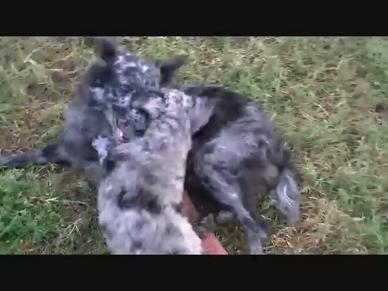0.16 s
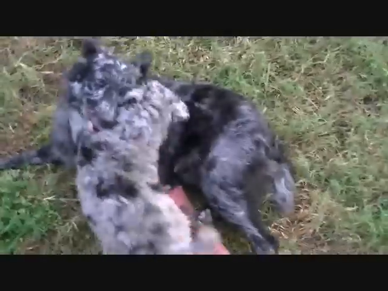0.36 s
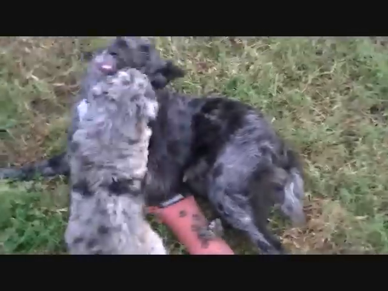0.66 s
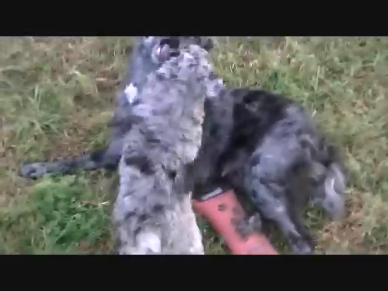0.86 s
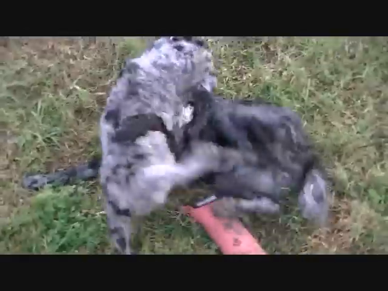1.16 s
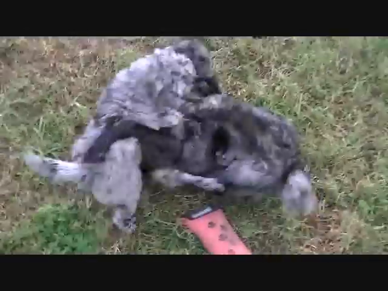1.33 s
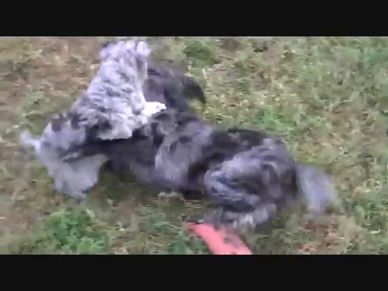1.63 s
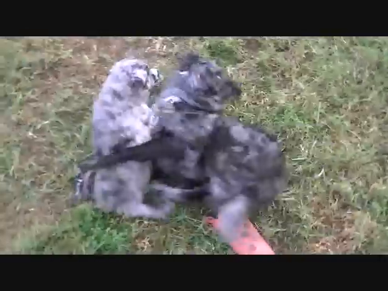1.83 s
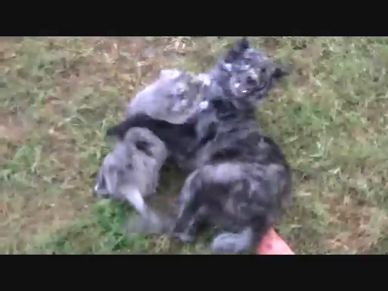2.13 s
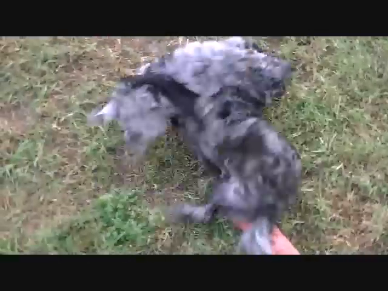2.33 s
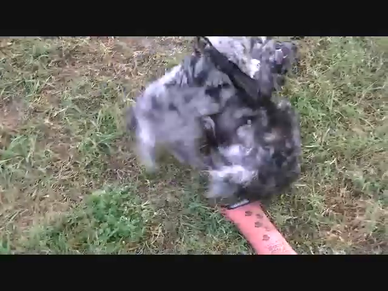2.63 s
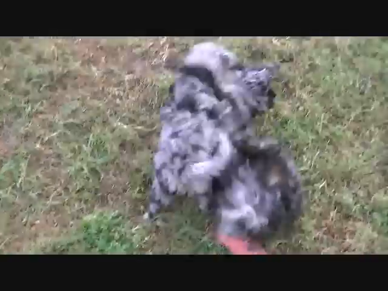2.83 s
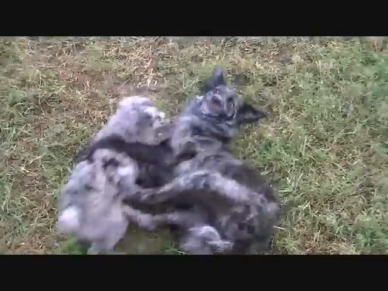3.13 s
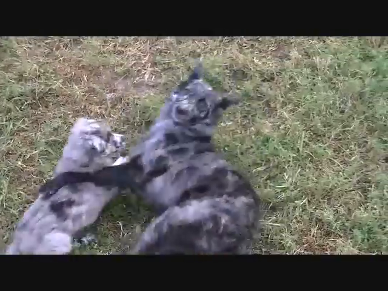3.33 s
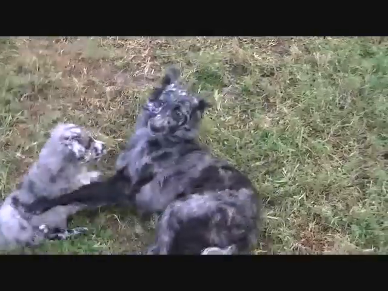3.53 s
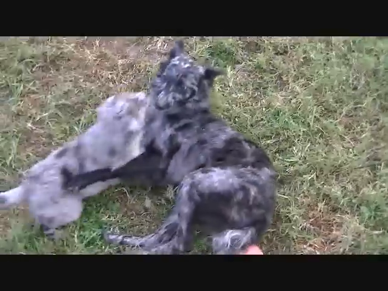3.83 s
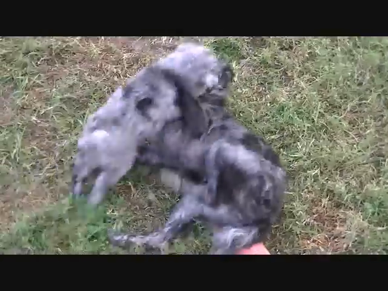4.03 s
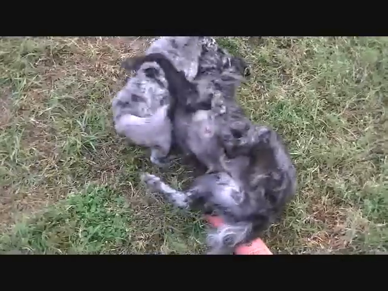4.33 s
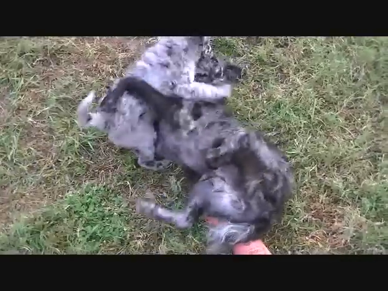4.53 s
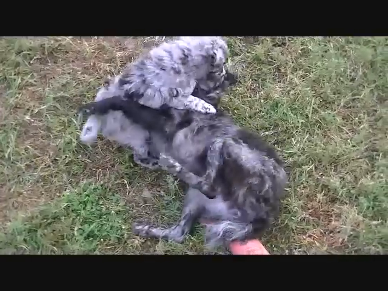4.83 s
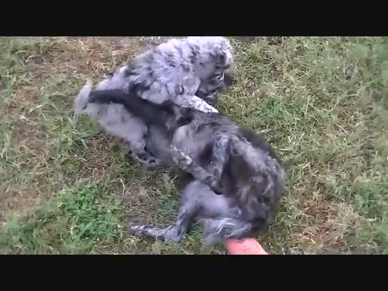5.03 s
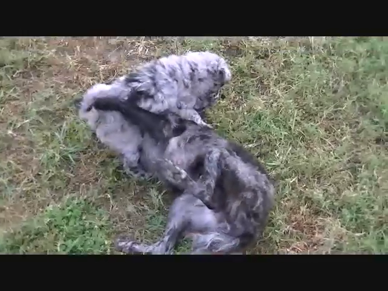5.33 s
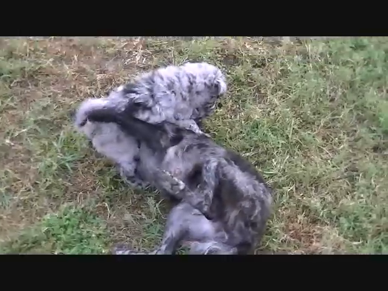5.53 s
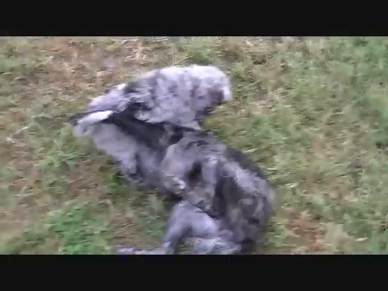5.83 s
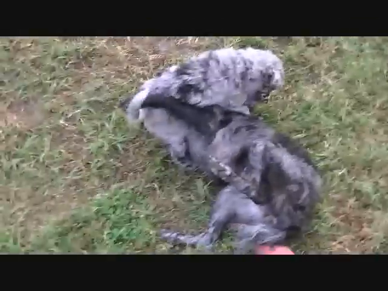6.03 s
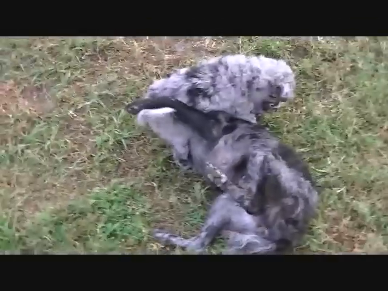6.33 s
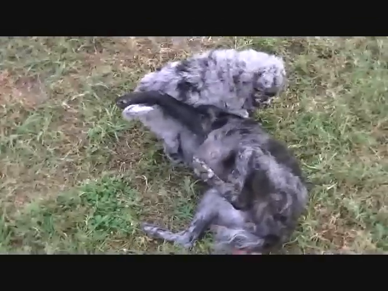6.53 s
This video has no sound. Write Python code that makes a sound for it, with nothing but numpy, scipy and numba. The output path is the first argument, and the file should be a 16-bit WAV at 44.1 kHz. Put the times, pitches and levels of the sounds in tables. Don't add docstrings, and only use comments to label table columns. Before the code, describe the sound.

Outdoors on a lawn, close to a small camera, a loud hollow jaw clap opens over bodies rolling in grass. A tooth snap follows, then hoarse, fluttering snorts and pants come in quick uneven bursts, with wet crackles and short low grunts. The breaths thin out, a few dry ticks sound, and the puppy whimpers at the very end. A small engine drones far away in soft yard hiss.

```python
import sys
import numpy as np
from scipy import signal
from scipy.fft import rfft, irfft
from scipy.io import wavfile
from scipy.ndimage import uniform_filter1d
from numba import njit

SR = 44100
rng = np.random.default_rng(int(sys.argv[2]) if len(sys.argv) > 2 else 0)


def gain_from_db(level_db):
    decades = np.asarray(level_db, float) / 20
    return 10 ** decades


def transcribe(u):
    v = np.clip(np.atleast_2d(u).T, -1, 1)
    q = np.round(v * 32767).astype(np.int16)
    wavfile.write(sys.argv[1], SR, q)


N = 294147


def rms_one(x):
    return x / np.sqrt(np.mean(x ** 2) + 1e-20)


def in_time(rows):
    s, *columns = np.transpose(rows)
    return [np.interp(np.arange(N) / SR, s, c) for c in columns]


def drift(rate_hz):
    r = np.exp(-16 * np.pi * rate_hz / SR)
    slow = signal.lfilter([1], [1, -2 * r, r * r], rng.standard_normal(N // 8 + 9002))[9000:]
    return np.interp(np.arange(N) / 8, np.arange(len(slow)), rms_one(slow))


def band(x, low_hz, high_hz, order=2):
    return signal.sosfilt(signal.butter(order, [low_hz, high_hz], "band", fs=SR, output="sos"), x)


@njit
def glide(x, turn, r):
    y = np.zeros(len(x))
    for i in range(2, len(x)):
        y[i] = x[i] - x[i - 2] + 2 * r * np.cos(turn[i]) * y[i - 1] - r * r * y[i - 2]
    return y


def resonance(x, hz, width_hz):
    return rms_one(glide(x, 2 * np.pi * (hz + np.zeros(N)) / SR, np.exp(-np.pi * width_hz / SR)))


def burst(s, peak_db, shape):
    out, i = np.zeros(N), round(s * SR)
    out[i:i + len(shape)] = (gain_from_db(peak_db) * shape / np.abs(shape).max())[:N - i]
    return out


def ring(hz, samples, rise_s, decay_s):
    t = np.arange(samples) / SR
    return np.sin(2 * np.pi * hz * t) * np.minimum(t / rise_s, 1) * np.exp(-t / decay_s)


def grains(per_s, spread_db):
    sizes = gain_from_db(spread_db * np.minimum(rng.exponential(1, N), 5)) * rng.choice([-1, 1], N)
    return rms_one(sizes * (rng.random(N) < per_s / SR))


def swells(rows, rise_s, fall_s):
    t, (s, hold) = np.arange(0, N + 32, 32) / SR, np.transpose(rows)[:2, :, None]
    late = np.maximum((s - t) / rise_s, (t - s - hold) / fall_s)
    return gain_from_db(-40 * np.clip(late, 0, 6))


def mixed(shapes, values):
    return np.interp(np.arange(N) / 32, np.arange(shapes.shape[1]), values @ shapes)


# (multiple of shaft rate, level [dB])
ENGINE_ORDERS = [(4, -72), (5, -60.5), (6, -60.5), (7, -60.5), (8, -72)]
# (time [s], pitch [Hz], level [dB])
VEHICLE = [
    [(0, 98, -63), (1.5, 108.4, -67), (3.2, 126.7, -68), (3.8, 128, -87)],
    [(2.5, 66.5, -80), (5, 75.2, -79), (6.67, 92, -62)],
    [(4.3, 124, -107), (5, 129, -60), (6.67, 122.4, -57)],
]


def engines():
    shaft_hz = 28.05 * gain_from_db(0.021 * drift(1.44))
    phase = 2 * np.pi * np.cumsum(shaft_hz) / SR
    out = np.zeros(N)
    for k, db in ENGINE_ORDERS:
        level = gain_from_db(db + 1.5 + 0.37 * drift(0.73))
        out += level * np.sin(k * phase + rng.uniform(0, 6.23))
    for gear in VEHICLE:
        hz, db = in_time(gear)
        out += gain_from_db(db - 6.0 + 5.4 * drift(2.1)) * np.sin(2 * np.pi * np.cumsum(hz) / SR)
    return out, phase


# (frequency [Hz], density [dB per Hz])
YARD = [(15, -55), (30, -25.5), (80, -7.5), (125, -11.5), (170, 0.5), (215, -17.5), (260, -7.5),
        (480, -5.5), (820, -2), (1700, -7), (3600, -9), (6100, -17), (8000, -23), (11000, -37.5)]


def yard(phase):
    edges_hz = 25 * 2 ** np.arange(0, 9.1, 1 / 3)
    white = rng.standard_normal((2, N))
    hz_points, db_points = np.transpose(YARD)
    out = np.zeros(N)
    for k, (low, high) in enumerate(zip(edges_hz, edges_hz[1:])):
        level_db = np.interp(np.log(low * high) / 2, np.log(hz_points), db_points)
        throb_db = 1.7 * np.sin(phase) * (low > 2000)
        out += gain_from_db(level_db + throb_db + 1.45 * drift(19.4)) * band(white[k % 2], low, high)
    return gain_from_db(-49.54) * rms_one(out)


# (time [s], level [dB])
ROLLING = [
    (0.0, -43.5),
    (0.142, -36.5),
    (.28, -42.5),
    (0.41, -37.5),
    (0.6, -38),
    (0.842, -47),
    (1.4, -55),
    (1.8, -64),
]
# (time [s], level [dB])
BUSTLE = [(0, -51), (.39, -53), (.57, -50), (.8, -55), (.99, -64.5), (1.15, -54.5), (1.4, -49.5),
          (1.56, -59.5), (1.8, -48.5), (2.12, -56), (2.45, -52), (3.03, -63), (3.45, -54.5), (4.15, -64.5),
          (4.36, -67.5), (5.3, -71), (6.2, -68.5), (6.67, -53.5)]
# (time [s], hold [s], level [dB], brightness [0 low - 2 high])
SWISHES = [(0.103, 0.062, -51, 0.29), (.62, 0.012, -47, 1.6), (0.91, .005, -53, 1.7),
           (1.258, 0.034, -43.5, 0.92), (1.323, 0.028, -51.5, 0.21), (1.633, 0.041, -49, 1.1),
           (1.75, .01, -58, 1.2), (1.905, 0.018, -56, 0.47), (1.94, 0.057, -44.5, 1.36),
           (2.215, 0.013, -44.5, 0.18), (2.239, 0.032, -43, 1.17), (2.32, 0.021, -50, 0.081),
           (2.435, .02, -52.5, 0.89), (2.54, 0.023, -60, 0.38), (2.565, 0.013, -47, 1.3),
           (2.812, 0.019, -51, 2.2), (2.856, 0.095, -49, 0.67), (3.23, 0.087, -54, 1.55),
           (3.36, 0.025, -53.5, 0.15), (4.157, 0.077, -56.5, 2), (4.294, 0.047, -61, 1.5),
           (4.39, .055, -57.5, 0.54), (4.827, .01, -58.5, 0.76), (6.59, 0.067, -50, 3.04)]
# (time [s], centre [Hz])
TEETH = [(.1, 4530), (1.21, 4800), (1.26, 4350), (1.33, 4200), (1.64, 5630), (1.92, 5500), (1.98, 4930),
         (2.2, 4530), (2.26, 5530), (2.53, 5070), (2.58, 4620), (2.86, 4360), (2.93, 4150), (3.25, 5730),
         (4.4, 4600), (6.6, 4500)]


def rustle(flap):
    blades = (rng.standard_normal(N) + 1.13 * grains(900, spread_db=-8.5)) * flap ** 0.28
    low_hz = 2520 * gain_from_db(.5 * drift(10.5))
    teeth_hz, = in_time(TEETH)
    low = rms_one(band(resonance(blades, low_hz, 500), 2370, 3850))
    middle = resonance(resonance(blades, teeth_hz, 1000.), teeth_hz, 2400.)
    middle = rms_one(band(middle, 3200, 6800))
    high = band(blades + 2.0 * rng.standard_normal(N), 6020, 10700)
    high = rms_one(band(high, 4300, 11300, order=1))

    (roll_db,), (bustle_db,) = in_time(ROLLING), in_time(BUSTLE)
    out = gain_from_db(roll_db - 10.0) * rms_one(band(blades, 830, 2590))
    spill_db = np.transpose(PANTS)[3] - 14.5
    spill = mixed(swells(PANTS, PANT_RISE_S, PANT_FALL_S), gain_from_db(2 * spill_db))
    shapes = swells(SWISHES, rise_s=0.1, fall_s=0.068)
    db, brightness = np.transpose(SWISHES)[2:]
    hisses = ((low, -2, 0.47), (middle, -3.5, 0.58), (high, 1, 0.79))   # (signal, dB, dB per bustle dB)
    for k, (hiss, hiss_db, follows) in enumerate(hisses):
        steady_db = hiss_db - 63.5 + follows * (bustle_db + 62.0)
        off_colour_db = 4.5 * (k - brightness) ** 2
        swish = mixed(shapes, gain_from_db(2 * (db - off_colour_db)))
        out += np.sqrt(gain_from_db(2 * steady_db) + swish + spill * (k == 0)) * hiss
    return out


# (time [s], peak [dB], ring [Hz])
CRACKLES = [(1.5988, -39, 3380), (1.6353, -31, 3550), (1.8138, -39, 2310), (1.8767, -36, 2080),
            (1.9016, -31, 2620), (1.9555, -25, 2000), (2.1356, -46, 2810), (2.1621, -36, 2550),
            (2.204, -29, 2430), (2.204, -26, 2000), (2.2678, -27, 2190), (2.3037, -29, 2240),
            (2.3152, -29, 2160), (2.3322, -27, 2120), (2.5212, -35, 2390), (2.5392, -31, 2500),
            (2.7073, -41, 3630), (2.7442, -40, 2240), (2.7727, -38, 2180), (2.853, -34, 2960),
            (2.9627, -32, 2100), (3.0685, -41, 2890), (3.1408, -37, 3400), (3.2127, -38, 2200),
            (3.2361, -34, 2180), (3.2511, -26, 2220), (3.3558, -34, 2540)]
# (time [s], peak [dB], ring [Hz])
TICKS = [(.0462, -34.5, 8260), (.9905, -40, 3600), (1.0256, -34, 2000), (1.255, -34, 1750),
         (1.267, -33, 1700), (1.276, -32, 4200), (1.657, -28, 1500), (1.965, -26, 4800),
         (1.983, -28, 5100), (2.198, -29, 2800), (2.2055, -24, 2900), (2.5312, -30, 5040),
         (2.5505, -27, 2780), (2.5643, -23, 1900), (2.5778, -27, 2400), (2.5855, -30, 2000),
         (2.597, -31, 4600), (2.606, -33, 4700), (2.9158, -31, 2900), (2.9462, -33, 2600),
         (4.1805, -34.5, 3000)]


def crackles():
    rows = [(s, db - 4.5, hz) for s, db, hz in CRACKLES] + TICKS
    return sum(burst(s, db, ring(hz, 300, rise_s=0.00038, decay_s=0.00062)) for s, db, hz in rows)


# (time [s], peak [dB])
JAW = [
    (0.01647, -9.4),
]
# (time [s], peak [dB], t60 [s], lowest [Hz], highest [Hz])
SNAPS = [
    (0.7318, -19.5, 0.034, 950, 12000),
    (0.9453, -26.5, 0.008, 1900, 9800),
    (1.518, -34, .005, 5500, 14600),
    (5.3615, -32, 0.03, 900, 7000),
    (5.444, -39, .004, 4200, 14600),
    (5.4525, -43, .003, 4200, 9000),
    (5.482, -43, .004, 4200, 8200),
    (5.5255, -34, 0.006, 1500, 10300),
    (6.5675, -33, 0.005, 6000, 14600),
]
# (frequency [Hz], level [dB], t60 [s])
TOOTH = [(1150, -5, .012), (1600, -14, .01), (2400, 2, .022), (2720, -5, .018), (3420, -5, .014),
         (3930, -2, .016), (4650, -5, .008), (5190, 1, .012), (6050, -2, .012), (7690, -6, .009),
         (9300, -8, .007)]
# (frequency [Hz], level [dB], t60 [s])
TWIG = [(2370, 0, .03), (2840, -6, .012), (3300, -4, .006), (4200, -4, .006), (4820, -8, .008),
        (5590, -11, .008), (7230, -10, .006), (8000, -4, .008), (9180, -10, .006)]
REBOUNDS_S = (0, .0007, .0012, .0019, .0027)


def modes(rows, t):
    return sum(gain_from_db(db - 60 * t / t60) * np.sin(2 * np.pi * hz * t) for hz, db, t60 in rows)


def snaps():
    t = np.arange(900) / SR
    cycles = 1600 * t + .19 * (1 - np.exp(-t / .00006))
    clap_shape = np.exp(-((t - .00055) / .00062) ** 2) + .07 * np.exp(-t / .0048)
    clap = np.sin(2 * np.pi * cycles) * clap_shape
    crack = .12 * np.sin(2 * np.pi * 4700 * t) * np.exp(-t / .0004)
    out = burst(JAW[0][0], JAW[0][1], band(clap + crack, 100, 7000))

    tooth, twig = modes(TOOTH, t), modes(TWIG, t)
    noises = rng.standard_normal((len(SNAPS), len(t)))
    for (s, db, t60, low_hz, high_hz), noise in zip(SNAPS, noises):
        contacts = noise * np.minimum(t / 0.00016, 1) * gain_from_db(-60 * t / np.clip(t60, .002, .016))
        rebounds = sum(gain_from_db(-60 * lag / t60) * (t == t[round(lag * SR)]) for lag in REBOUNDS_S)
        rattle = .08 * contacts + rebounds
        body = twig if 1500 < low_hz < 4000 else tooth
        struck = np.convolve(rattle, body * gain_from_db(-60 * t / (3 * t60)))[:len(t)]
        out += burst(s, db, band(struck + 2.2 * contacts, low_hz, min(high_hz, 12400)))
    return out


# (time [s], pitch [Hz], level [dB], second partial, opens with mouth [dB])
WHIMPER = [
    (6.478, 450, -85, -26),
    (6.504, 510, -45, -26),
    (6.523, 549, -36, -24),
    (6.531, 554, -35.5, -13),
    (6.553, 562, -36, -15),
    (6.582, 557, -41, -10),
    (6.629, 564, -41.5, -24),
    (6.641, 562, -41.5, -9),
    (6.67, 548, -46.5, -9),
]


def whimper():
    hz, db, open_db = in_time(WHIMPER)
    t = np.arange(N) / SR
    crack = np.exp(-((t - 6.603) / .005) ** 2)
    dip_hz = 40 * crack
    phase = 2 * np.pi * np.cumsum((hz - dip_hz) * gain_from_db(.11 * drift(260))) / SR
    upper_db = open_db + 13 * crack
    rasp = gain_from_db(-19) * rms_one(band(rng.standard_normal(N), 500, 1600))
    partials = ((0, .11),   # (dB, unsteadiness)
                (upper_db, .3 * (1 - crack)),
                (upper_db - 7 + 3 * crack, .35 * (1 - crack)))
    tone = np.zeros(N)
    for k, (partial_db, unsteady) in enumerate(partials):
        tone += gain_from_db(partial_db) * (1 + unsteady * drift(120)) * np.sin((k + 1) * phase)
    wobble = sum(np.exp(-((t - s) / .005) ** 2) for s in (6.622, 6.651))
    half = gain_from_db(-8) * wobble * np.sin(1.5 * phase)
    return gain_from_db(db) * (rasp + np.sqrt(2) * (tone + half))


# (time [s], length [s], pitch [Hz], level [dB])
GRUNTS = [
    (1.07, 0.14, 199.7, -45.5),
    (2.17, 0.11, 203.7, -44),
    (2.76, 0.32, 201, -49.5),
    (3.2, 0.14, 205.6, -46.5),
    (4.3, 0.19, 203.2, -48.5),
    (4.72, 0.11, 185, -46.5),
    (5.04, 0.16, 166.2, -47.5),
]


def grunts():
    out = np.zeros(N)
    for s, length, hz, db in GRUNTS:
        t = np.arange(round(length * SR)) / SR
        hum = np.sin(2 * np.pi * hz * t) + 0.22 * np.sin(4 * np.pi * hz * t)
        out += burst(s, db - 1.5, np.sin(np.pi * t / length) * hum)
    return out * gain_from_db(2.0 * drift(28))


# (time [s], peak [dB], ring [Hz])
CATCHES = [(1.3136, -42, 1760), (1.6454, -28, 580), (1.6556, -33, 1700), (1.8621, -28, 1320),
           (1.874, -32, 1200), (1.8946, -33, 1520), (1.9069, -21, 1620), (1.9185, -22, 1100),
           (1.943, -19, 1180), (1.9584, -25, 2050), (1.9714, -21, 1110), (1.984, -38, 1960),
           (1.9928, -36, 1850), (2.1646, -46, 640), (2.1957, -42, 590), (2.2036, -22.5, 2620),
           (2.2193, -24, 613), (2.2366, -26, 710), (2.2485, -40, 1020), (2.2677, -22, 1110),
           (2.281, -23, 2220), (2.3034, -31, 2200), (2.3153, -25, 2200), (2.3338, -20, 2325),
           (2.3478, -44, 2100), (2.5153, -27, 690), (2.5297, -32, 1700), (2.5379, -24, 1090),
           (2.5462, -16, 1380), (2.5634, -18, 1050), (2.571, -33, 1590), (2.585, -47, 1630),
           (2.5931, -33, 1830), (2.7642, -38, 1070), (2.7903, -27, 680), (2.8208, -31, 1100),
           (2.8391, -31, 1150), (2.853, -30, 680), (2.8774, -34, 660), (2.9025, -32, 1230),
           (2.9154, -34, 1250), (2.9388, -24, 1170), (2.9475, -27, 1150), (2.9635, -25, 2100),
           (3.1955, -34, 1680), (3.2148, -38, 1670), (3.2279, -32, 1600), (3.2363, -28, 1710),
           (3.2511, -27, 1200), (3.2797, -37, 1070), (3.2999, -36, 1230), (4.1658, -24, 730),
           (4.1796, -23.5, 740), (4.3018, -25, 1220), (4.3187, -30, 1410), (4.3328, -38, 1160),
           (4.4007, -35, 1220), (4.425, -32, 1160)]
# (time [s], peak [dB], ring [Hz])
MORE_CATCHES = [
    (2.5485, -20, 1480),
    (2.6045, -28, 1760),
    (2.7925, -24, 1570),
    (1.9015, -23, 1470),
    (4.146, -25, 710),
    (4.159, -24, 760),
    (4.3938, -31, 1150),
    (4.43, -31, 1170),
    (2.197, -26, 2470),
]


def catches():
    rows = CATCHES + MORE_CATCHES
    return sum(burst(s, db - 8.5, ring(hz, 600, rise_s=0.0019, decay_s=0.002)) for s, db, hz in rows)


def flutter():
    turns = np.cumsum(63 * gain_from_db(2 * drift(20)) / SR)
    strength = .35 * gain_from_db(2.4 * rng.standard_normal(900))[turns.astype(int)]
    t = np.arange(900) / SR
    closing = np.minimum(t / .002, 1) * np.exp(-t / .004)
    wide = 1.3 * sum(burst(s, 0, closing) for s, db, hz in CATCHES)
    return uniform_filter1d(.5 + strength * np.exp(-(turns % 1) / .4) + wide, size=90)


# (time [s], hold [s], throat [dB], chest [dB], throat [Hz])
SNORTS = [(0.62, 0.016, -46, -46, 770), (1.092, 0.024, -43, -50, 640), (1.162, 0.02, -42, -78, 660),
          (1.312, 0.037, -48.5, -73, 640), (1.62, 0.024, -40.5, -45.5, 628), (1.652, 0.048, -45, -52, 590),
          (1.875, 0.046, -58, -42.5, 664), (1.965, 0.022, -46, -40, 640), (2.184, 0.047, -39, -45.5, 584),
          (2.266, 0.091, -45.5, -48, 594), (2.537, 0.042, -38.5, -43, 655), (2.786, 0.024, -39.5, -43, 665),
          (2.831, 0.12, -43.5, -45.5, 643), (3.196, 0.02, -54, -53, 660), (3.255, 0.1, -44.5, -43.5, 643),
          (3.628, 0.036, -62, -41.5, 600), (4.16, 0.029, -50, -48, 710), (4.292, 0.036, -46, -45.5, 604),
          (4.384, 0.098, -47, -46, 684), (4.75, 0.073, -56, -50.5, 706)]
# (time [s], hold [s], mouth [dB], lips [dB], lips [Hz])
PANTS = [(0.61, 0.0078, -41.5, -39.5, 1830), (1.086, 0.038, -51, -42.5, 1640),
         (1.24, 0.11, -57, -41.5, 1730), (1.648, 0.014, -42.5, -40, 1650), (1.868, 0.017, -43, -44, 1730),
         (1.902, 0.01, -38, -35.5, 1640), (1.948, 0.03, -38, -38, 1880), (2.186, 0.028, -40.5, -42, 1930),
         (2.252, 0.023, -40.5, -45, 2300), (2.316, 0.043, -44, -38, 2130), (2.528, .015, -50, -37, 1570),
         (2.537, 0.038, -40.5, -36, 1700), (2.771, 0.038, -46, -39, 1570), (2.837, 0.023, -41, -54, 1660),
         (2.885, 0.044, -42.5, -43, 1710), (2.935, 0.02, -43, -45, 1920), (3.19, 0.018, -47, -50, 1700),
         (3.23, 0.044, -45.5, -40.5, 1630), (3.288, 0.076, -44.5, -46, 1920),
         (3.627, 0.021, -39.5, -59, 1780), (4.17, 0.031, -56, -45.5, 1580), (4.298, 0.034, -41, -45, 1580),
         (4.408, 0.044, -41, -67, 1710), (4.752, 0.049, -44.5, -64, 1710)]
# (time [s], centre [Hz])
TONGUE = [(.6, 1170), (1.2, 1190), (1.65, 1000), (1.87, 1210), (1.92, 1084), (2.2, 1100), (2.35, 1040),
          (2.52, 1160), (2.56, 1050), (2.8, 1040), (2.95, 1250), (3.2, 1040), (3.26, 1130), (3.36, 1230),
          (3.63, 1210), (4.17, 1050), (4.3, 1170), (4.43, 1180)]
SNORT_RISE_S, SNORT_FALL_S, PANT_RISE_S, PANT_FALL_S = 0.073, 0.049, 0.071, 0.093


def huffs(flap):
    low = swells(SNORTS, SNORT_RISE_S, SNORT_FALL_S)
    high = swells(PANTS, PANT_RISE_S, PANT_FALL_S)
    throat_db, chest_db, throat_hz = np.transpose(SNORTS)[2:]
    pant_s, _, mouth_db, lips_db, lips_hz = np.transpose(PANTS)
    chest_hz = 255 + 2.5 * (chest_db + 40.5)
    mouth_hz = np.interp(pant_s, *np.transpose(TONGUE))
    airway = [(low, chest_db, chest_hz, 102.0), (low, throat_db, throat_hz, 139.0),
              (high, mouth_db, mouth_hz, 240.), (high, lips_db, lips_hz, 356.0)]
    breath = flap * (rng.standard_normal(N) + .5 * grains(700, spread_db=2.2))
    out = np.zeros(N)
    for k, (shapes, db, row_hz, width_hz) in enumerate(airway):
        power = mixed(shapes, gain_from_db(2 * db))
        hz = mixed(shapes, gain_from_db(2 * db) * row_hz) / power * gain_from_db(.12 * drift(3.0))
        voiced = resonance(resonance(breath, hz, width_hz), hz, 2.07 * width_hz)
        out += (-1) ** k * gain_from_db(-7.0) * np.sqrt(power) * voiced
    return out


def scene():
    drone, phase = engines()
    far = drone + yard(phase)
    flap = flutter()
    dogs = rustle(flap) + crackles() + snaps() + whimper() + grunts() + catches() + huffs(flap)
    dogs[90:] += gain_from_db(-21.0) * dogs[:-90]
    return (dogs + far)[None]


# (frequency [Hz], level [dB])
DROP = [(5000, -100), (6200, -83.5), (7200, -95.5), (8500, -88), (10300, -83.5)]
# (time [s], offset [Hz])
CUT_CREEP = [(0, -120), (2.2, -120), (3.1, 150), (6.67, 150)]


def starve(x):
    cut_hz = 10400
    hz, s, cells = signal.stft(x, SR, nperseg=1024, noverlap=512)
    power = uniform_filter1d(uniform_filter1d(np.abs(cells) ** 2, size=9, axis=0), size=7, axis=1)
    luck_db = 25 * uniform_filter1d(rng.standard_normal((257, len(s))), size=17, axis=1)
    luck_db = luck_db.repeat(2, axis=0)[:len(hz)]
    since = s - np.array([JAW[0][0]] + [row[0] for row in SNAPS])[:, None]
    hunger_db = 11 * np.max(np.exp(-np.abs(since) / .07) * (since > 0), axis=0)
    floor_db = np.interp(hz, *np.transpose([(3500, -140)] + DROP))[:, None] + hunger_db
    edge_hz = cut_hz + np.interp(s, *np.transpose(CUT_CREEP)) + 15 * luck_db[0]
    keep = (10 * np.log10(power + 1e-20) + luck_db > floor_db) & (hz[:, None] < edge_hz)
    snap_top_hz = np.array([7000] + [row[4] for row in SNAPS])[:, None]
    reach_hz = np.max((np.abs(since) < .007) * snap_top_hz, axis=0)
    at_snap = (hz[:, None] < reach_hz) * np.where(hz < cut_hz, 1, .15)[:, None]
    gain = np.maximum(np.maximum(keep, at_snap), .002)
    return signal.istft(cells * gain, SR, nperseg=1024, noverlap=512)[1][:N]


def treble_fill(x):
    low_hz, mid_hz, high_hz = 11170, 12050, 15250
    hz = np.fft.rfftfreq(N, 1 / SR)
    treble = uniform_filter1d(band(x, 8500, 13000) ** 2, size=300)
    follow = rms_one((treble + gain_from_db(-82) ** 2) ** 0.47)
    noise = rfft(follow * gain_from_db(0.47 * drift(37)) * rng.standard_normal(N))
    fill = np.zeros(N)
    for db, a, b in ((-72, low_hz, mid_hz), (-80, mid_hz, high_hz)):
        fill += gain_from_db(db) * rms_one(irfft(noise * (hz > a) * (hz < b), N))
    t, flares_s = np.arange(N) / SR, (.03, .94, 1.52, 5.3, 5.46, 5.76, 6.52)
    flare = sum(np.exp(-((t - s) / 0.033) ** 4) for s in flares_s)
    flare_noise = irfft(rfft(rng.standard_normal(N)) * (hz > mid_hz) * (hz < 14600), N)
    return fill + gain_from_db(-79) * flare * rms_one(flare_noise)


def band_limit(x):
    return signal.sosfilt(signal.butter(12, 15400, fs=SR, output="sos"), x)


def record(dry):
    fill = treble_fill(dry[0])
    low_cut = signal.butter(2, 45, "high", fs=SR, output="sos")
    mix = signal.sosfilt(low_cut, starve(dry[0])) + fill
    return band_limit(mix[None])


dry = scene()
out = record(dry)
transcribe(out)
```